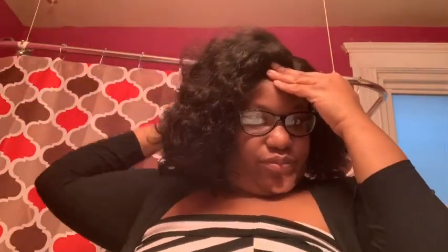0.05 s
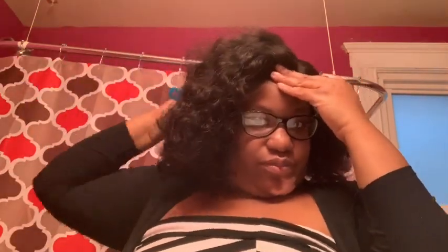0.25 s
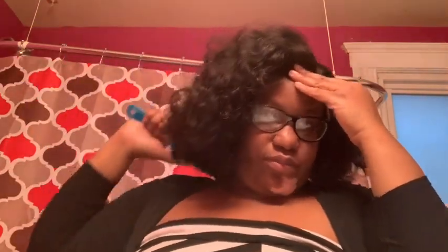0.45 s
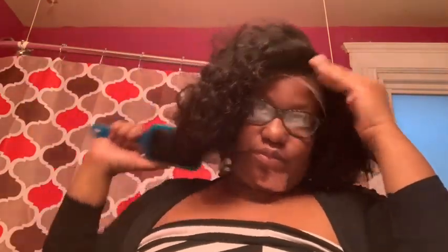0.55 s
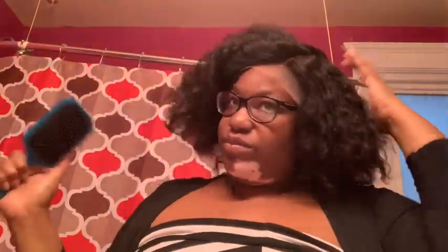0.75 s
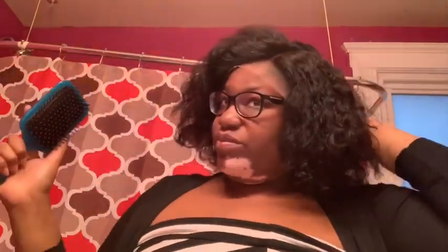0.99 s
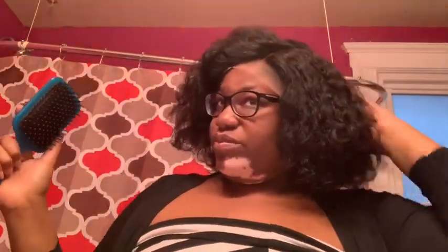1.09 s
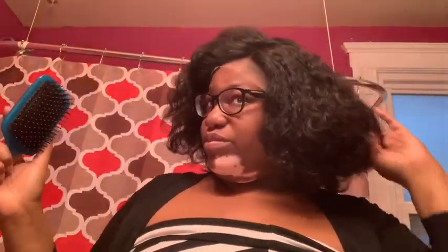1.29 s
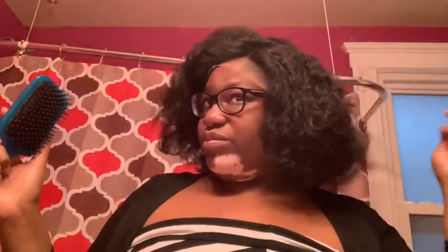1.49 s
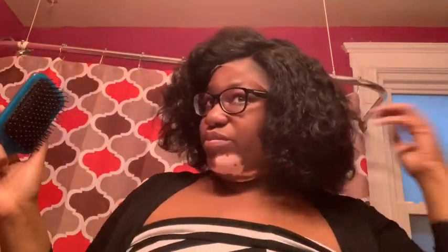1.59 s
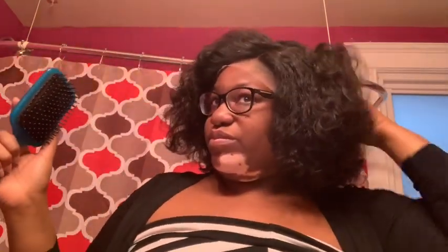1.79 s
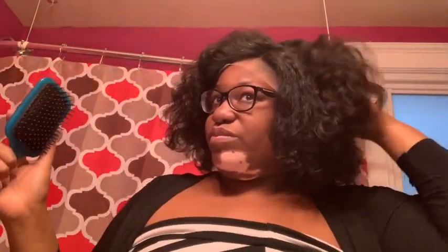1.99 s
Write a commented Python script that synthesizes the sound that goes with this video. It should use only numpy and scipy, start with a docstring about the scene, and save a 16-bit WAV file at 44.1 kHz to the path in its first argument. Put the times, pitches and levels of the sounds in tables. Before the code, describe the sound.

A hairbrush rasps once through curly hair, then a hand faintly rustles the curls.

```python
"""A paddle brush is pulled once through a curly wig in a small bathroom, then a hand smooths the hair.
Bristles catch and flick free, ringing the hollow paddle; strands hiss as they slide off;
the last snags let go with a snap. Fingers rustle faintly in the curls over a low room rumble."""
import sys
import numpy as np
from scipy import signal
from scipy.fft import rfft, irfft
from scipy.io import wavfile
from scipy.ndimage import uniform_filter1d

SR = 44100
rng = np.random.default_rng(int(sys.argv[2]) if len(sys.argv) > 2 else 0)


def unload_audio(sound):
    """Save the sound as a 16-bit wav file, at the path given as the first command line argument."""
    columns = np.transpose(np.atleast_2d(sound))
    # keep every value between -1 and 1, then stretch to whole-number steps
    steps = np.round(np.clip(columns, -1, 1) * 32767)
    wavfile.write(sys.argv[1], SR, steps.astype(np.int16))


N = 90404
FLICKS_PER_S, STRANDS_PER_S = 1200, 8300


def undb(db):
    """Decibels to gain."""
    return 10 ** (np.asarray(db) / 20)


def unit(x):
    """Scale to rms 1."""
    return x / np.sqrt(np.mean(x ** 2))


def curve(rows):
    """Gain from (time [s], level [dB]) points, silent outside them."""
    s, db = np.array(rows).T
    return undb(np.interp(np.arange(N) / SR, s, db, left=-120, right=-120))


def through(x, response):
    """Convolve with an impulse response."""
    return signal.fftconvolve(x, response)[:N]


def colour(points, size=4096):
    """Minimum-phase response of unit energy from (frequency [Hz], level [dB]) points."""
    hz, db = np.array(points).T
    f = np.maximum(np.arange(size // 2 + 1) * SR / size, 1)
    magnitude = undb(np.interp(np.log(f), np.log(hz), db))
    cepstrum = irfft(np.log(magnitude))
    cepstrum[1:size // 2] *= 2
    cepstrum[size // 2 + 1:] = 0
    response = irfft(np.exp(rfft(cepstrum)))
    return response / np.linalg.norm(response)


def grains(per_s, spread_db):
    """Random impulses of uneven size, rms 1."""
    hits = rng.random(N) < per_s / SR
    size = np.minimum(rng.exponential(size=N), 4)
    sign = rng.choice([-1, 1], N)
    return unit(hits * sign * undb(spread_db * size))


def impulses(rows):
    """One impulse per (time [s], level [dB]) row."""
    out = np.zeros(N)
    for s, db in rows:
        out[int(s * SR)] += undb(db)
    return out


def flutter(per_s=35, depth_db=1.3):
    """Gain that wobbles as curls pass one after another."""
    step = int(SR / per_s)
    held = np.repeat(rng.standard_normal(N // step + 1), step)
    return undb(depth_db * uniform_filter1d(held, step)[:N])


def background(floor_db=-63):
    """Steady rumble and faint hiss, with wavering low room resonances."""
    # noise floor spectrum (frequency [Hz], relative level [dB])
    floor_spectrum = [(15, -61), (25, -21.5), (86, 1.5), (119, -8.5), (156, -1.5), (305, -14.5),
                      (340, -8.5), (389, -16), (684, -19.5), (1110, -32), (1200, -32), (6730, -39),
                      (10300, -43.5), (15500, -45.5)]
    # room resonances (frequency [Hz], half-width [Hz], level [dB])
    resonances = [(97, 48, -74.5), (159.3, 15.2, -66), (321.7, 36, -77.5)]
    # waver of the resonances (time [s], gain [dB])
    waver = [(0, 3), (0.65, 0.5), (1.0, -3.5), (1.35, -1.5), (1.5, 5), (1.7, -3), (1.93, -2.5), (2.06, -17)]
    f = np.arange(N // 2 + 1) * SR / N
    floor = irfft(rfft(rng.standard_normal(N)) * rfft(colour(floor_spectrum), N), N)
    out = undb(floor_db) * unit(floor)
    for hz, width_hz, db in resonances:
        band = irfft(rfft(rng.standard_normal(N)) / (1 + ((f - hz) / width_hz) ** 2), N)
        out += undb(db) * curve(waver) * unit(band)
    return out


def bathroom(x):
    """Standing waves colour the lows; close walls add dense reflections, the treble dying sooner."""
    # standing waves (frequency [Hz], relative level [dB])
    modes = [(205, -6.5), (220, -15), (318, 4), (368, -1), (420, -2), (495, 2.5), (534, -1.5), (610, 10.5),
             (671, 0), (718, -17.5), (748, -6), (835, -1), (905, -9.5)]
    low_t60_s, high_t60_s, mode_t60_s, gap_s = 0.47, 0.36, 0.17, 0.0024
    split_hz, low_db, tail_db, modes_db = 1500, -3, -4.5, 1
    t = np.arange(SR // 2) / SR
    low, high = (signal.sosfilt(signal.butter(2, split_hz, side, fs=SR, output="sos"),
                                rng.standard_normal(len(t))) for side in ("low", "high"))
    fade = lambda t60_s: undb(-60 * t / t60_s)
    tail = (undb(low_db) * low * fade(low_t60_s) + high * fade(high_t60_s)) * (t > gap_s)
    waves = sum(undb(db) * np.cos(2 * np.pi * hz * t) for hz, db in modes) * fade(mode_t60_s)
    waves *= 2 / np.sum(fade(mode_t60_s))
    return x + through(x, undb(tail_db) * tail / np.linalg.norm(tail) + undb(modes_db) * waves)


def hand(grains_per_s=11000, spread_db=2.5, bump_db=-32):
    """Finger passes swell and fade in a soft rustle; the sleeve shifts; the hand lands with a bump."""
    # finger passes (peak time [s], rise [s], fall [s], level [dB], papery scrape re hiss [dB])
    passes = [(0.87, 0.17, .1, -85, -2.5), (1.03, 0.16, 0.15, -74.5, -7), (1.13, 0.091, 0.2, -70.5, -8),
              (1.278, 0.11, 0.1, -65.5, -12.5), (1.364, 0.058, 0.03, -70.5, -23),
              (1.721, 0.087, 0.055, -73, 0), (1.8, 0.035, .05, -86, 4.5), (1.925, 0.064, 0.12, -82.5, -10)]
    # finger hiss spectrum (frequency [Hz], relative level [dB])
    hiss_spectrum = [(300, -18), (2300, -12.5), (3000, -5.5), (4600, -8), (4950, 2.5), (5600, -2),
                     (6700, 0.5), (7800, 2), (8600, -2.5), (12400, -3.5), (13600, -1), (16000, -3)]
    # papery scrape spectrum (frequency [Hz], relative level [dB])
    papery_spectrum = [(200, -19.5), (700, 0), (1400, 3), (2200, -8), (2900, 3.5), (3800, -1.5), (4700, -6),
                       (7000, -5), (15000, -18)]
    # hand landing (time [s], relative level [dB])
    bumps = [(0.937, -7.5)]
    # sleeve and hair shifting with the arm (time [s], level [dB])
    shift = [(0.8, -97), (0.93, -71.5), (1.0, -88), (1.12, -93), (1.28, -75.5), (1.42, -100)]
    # bump and sleeve spectrum (frequency [Hz], relative level [dB])
    dull_spectrum = [(80, -35), (250, 5.5), (550, 8.5), (900, -20.5), (2500, -14), (9000, -63)]
    edge_drop_db = 20.5  # one rise or fall time from the peak
    t = np.arange(N) / SR
    hiss_power, papery_power = 0, 0
    for peak_s, rise_s, fall_s, db, papery_db in passes:
        offset = (t - peak_s) / np.where(t < peak_s, rise_s, fall_s)
        swell = undb(db - edge_drop_db * offset ** 2)
        hiss_power += swell ** 2
        papery_power += (swell * undb(papery_db)) ** 2
    hiss = through(np.sqrt(hiss_power) * grains(grains_per_s, spread_db), colour(hiss_spectrum))
    papery = through(np.sqrt(papery_power) * grains(grains_per_s, spread_db), colour(papery_spectrum))
    handling = undb(bump_db) * impulses(bumps) + curve(shift) * grains(FLICKS_PER_S, spread_db)
    return (hiss + papery) * flutter() + through(handling, colour(dull_spectrum))


def strands(gain_db=-54):
    """Fibres scrape past the bristles in a fine dense crackle."""
    # strands sliding (time [s], relative level [dB])
    slide = [(0.14, -25.5), (0.175, -31), (0.25, -11.5), (0.305, -4.5), (0.355, -1), (0.41, -4.5),
             (0.49, -8.5), (0.565, -12.5), (0.605, -31)]
    # crackle spectrum (frequency [Hz], relative level [dB])
    spectrum = [(200, 0.5), (900, 3), (2000, -5.5), (2900, 9), (5000, 2.5), (7400, 5), (8800, -1),
                (12000, 0), (15500, -3.5)]
    scrape = curve(slide) * flutter() * grains(STRANDS_PER_S, spread_db=0.5)
    return undb(gain_db) * through(scrape, colour(spectrum))


def snaps(gain_db=-10):
    """The last snags let go; nearby surfaces reflect each snap."""
    # snag releases (time [s], relative level [dB])
    releases = [(0.3535, -2), (0.359, -5.5)]
    # snap spectrum (frequency [Hz], relative level [dB])
    spectrum = [(150, -34.5), (600, 15), (1400, 13.5), (2100, 3.5), (3000, 7.5), (4500, -10.5),
                (8000, -20.5), (15000, -65.5)]
    # early reflections (delay [s], gain [dB])
    reflections = [(.0008, -2), (.0021, -16), (.0034, -16.5)]
    direct = undb(gain_db) * through(impulses(releases), colour(spectrum))
    return direct + through(direct, impulses(reflections))


def paddle(force, gain_db=-4):
    """The hollow paddle and its cushion ring under the bristle force."""
    # resonances (frequency [Hz], relative level [dB], T60 [s])
    modes = [(320, -6, .07), (535, 4, .08), (600, 0, .05), (905, -6, .06), (964, 2, .1), (1197, 3, .1),
             (1290, -3, .05), (1430, -3, .04), (1764, -10, .09)]
    t = np.arange(SR // 3) / SR
    ring = sum(undb(db - 60 * t / t60_s) * np.sin(2 * np.pi * hz * t) for hz, db, t60_s in modes)
    return undb(gain_db) * through(force, ring / np.linalg.norm(ring))


def brush():
    """A faint ring dies away; then bristles drag, catch and slip: they thud, rasp and ring the paddle."""
    # bristles catching in curls (time [s], relative level [dB], offset for thud and rasp [dB])
    catches = [(0.142, -19.5, -9), (0.164, -7, -19), (0.185, -1.5, -20), (0.213, 1, -11), (0.239, 4, -32.5),
               (0.248, 0.5, -12), (0.263, -7, 8.5), (0.275, 0, 4), (0.294, 0, 8), (0.305, 2.5, -4),
               (0.323, 2, 4.5), (0.341, -5.5, 1.5)]
    # faint ring dying away at the start, then drag on the hair (time [s], relative level [dB])
    bed_levels = [(0, -40.5), (0.12, -45.5), (0.18, -14), (0.24, -12.5), (0.262, -8), (0.285, -4),
                  (0.35, 2), (0.385, -6.5), (0.43, -27), (0.5, -24.5), (0.56, -19.5), (0.6, -35)]
    # body thud spectrum (frequency [Hz], relative level [dB])
    body_spectrum = [(60, -39), (140, -17.5), (195, 2), (222, -0.5), (255, -10), (325, 2), (450, -3),
                     (535, 1), (670, -2), (790, -3.5), (900, -5.5), (1100, -14), (1450, -14), (2100, -18),
                     (2800, -20.5), (4500, -30.5), (8000, -42), (15000, -62)]
    # bristle rasp spectrum (frequency [Hz], relative level [dB])
    rasp_spectrum = [(300, -6), (1300, 10.5), (2150, -16), (2900, 0.5), (4300, -2), (5800, -3),
                     (7100, -5.5), (9000, -12.5), (12000, -40), (15500, -25)]
    catch_db, bed_db, rasp_db = -37.5, -39, -12.5
    catch_to_rasp_db, flick_to_ring_db = -3, -29
    attack_s, decay_s = 0.0006, 0.0091
    cut_hz = 165  # the small paddle radiates little below this
    t = np.arange(SR // 3) / SR
    burst = undb(catch_db) * np.exp(-t / decay_s) * (1 - np.exp(-t / attack_s))
    catching = through(impulses([(s, db) for s, db, _ in catches]), burst)
    thudding = through(impulses([(s, db + thud_db) for s, db, thud_db in catches]), burst)
    bed = undb(bed_db) * curve(bed_levels)
    slips = grains(per_s=2700, spread_db=1.5)
    flicks = bed * grains(FLICKS_PER_S, spread_db=1.5)
    body = through(thudding * slips + flicks, colour(body_spectrum))
    ring = paddle(catching * slips + undb(flick_to_ring_db) * flicks)
    hollow = signal.sosfilt(signal.butter(4, cut_hz, "high", fs=SR, output="sos"), body + ring)
    scrape = (undb(catch_to_rasp_db) * thudding + bed) * grains(STRANDS_PER_S, spread_db=4.5)
    return hollow + undb(rasp_db) * through(scrape, colour(rasp_spectrum))


def scene():
    """Brush and hand in the bathroom, mono."""
    return (bathroom(brush() + snaps() + strands() + hand()) + background())[None]


def record(dry):
    """Steep low-pass."""
    top_hz = 15700
    return signal.sosfilt(signal.ellip(10, .1, 70, top_hz, fs=SR, output="sos"), dry)


dry = scene()
out = record(dry)
unload_audio(out)
```